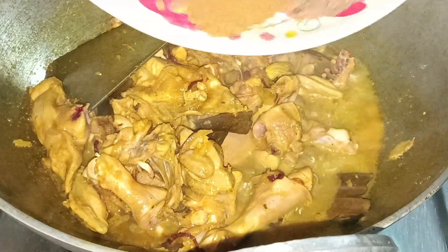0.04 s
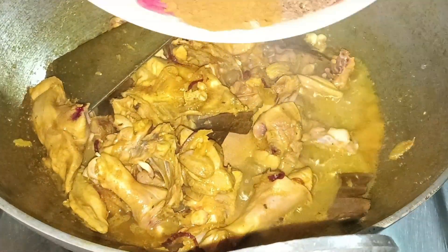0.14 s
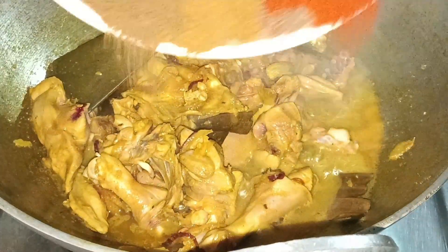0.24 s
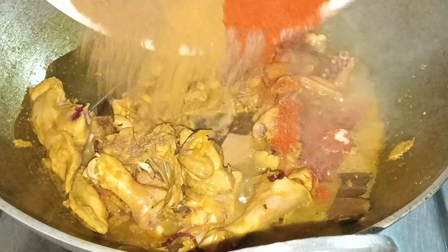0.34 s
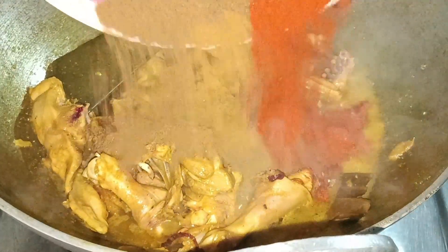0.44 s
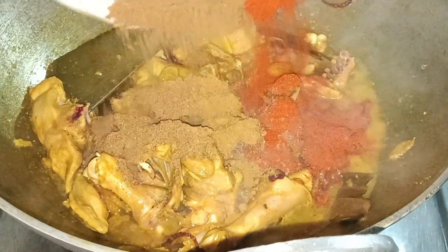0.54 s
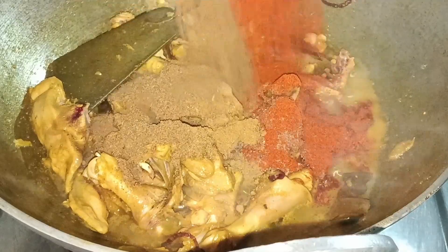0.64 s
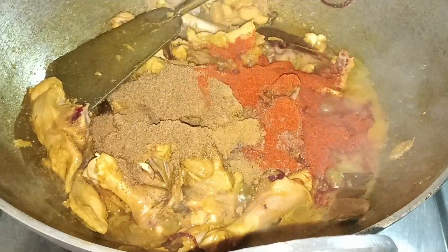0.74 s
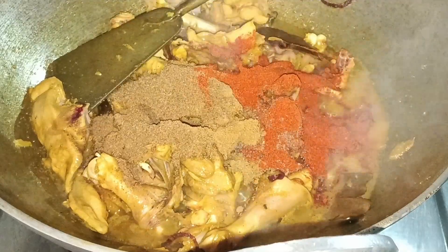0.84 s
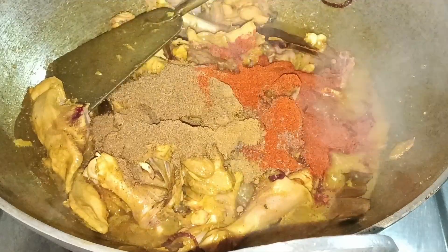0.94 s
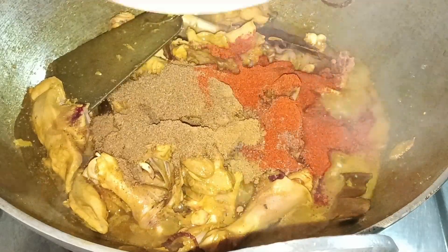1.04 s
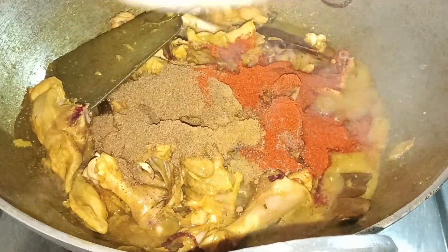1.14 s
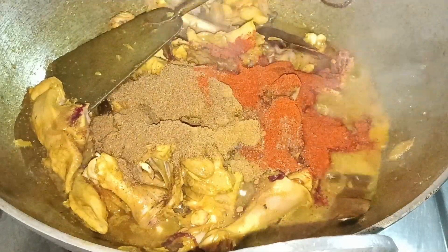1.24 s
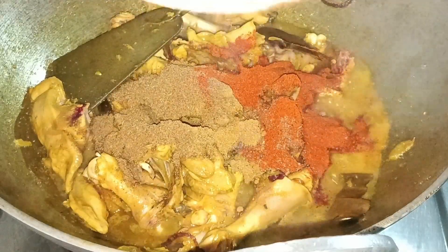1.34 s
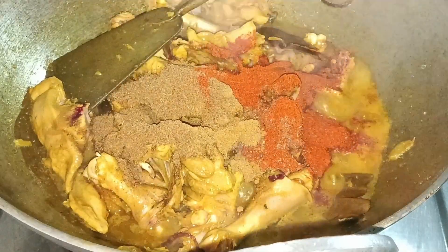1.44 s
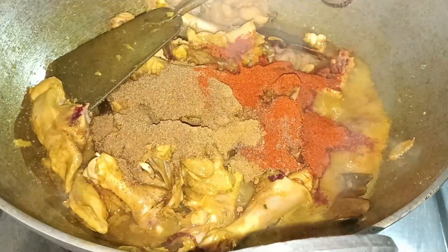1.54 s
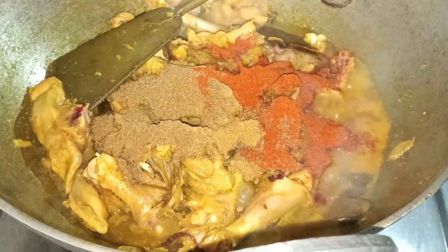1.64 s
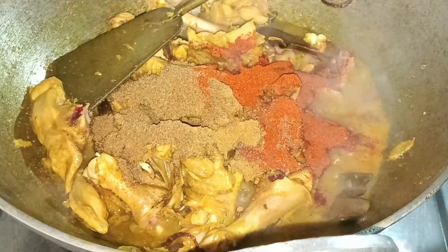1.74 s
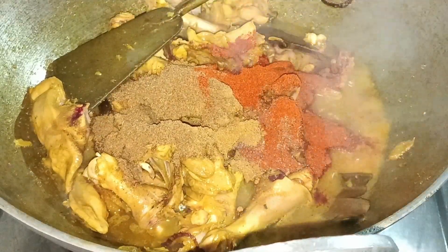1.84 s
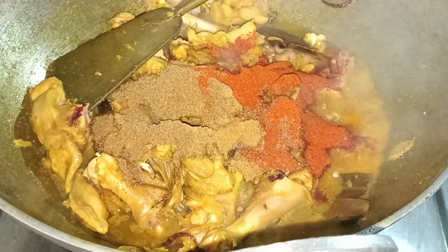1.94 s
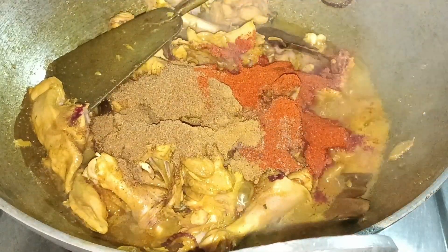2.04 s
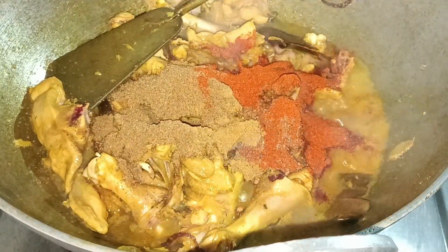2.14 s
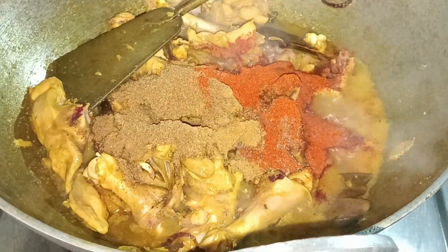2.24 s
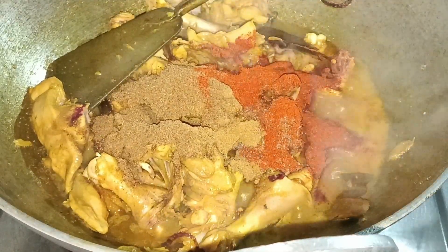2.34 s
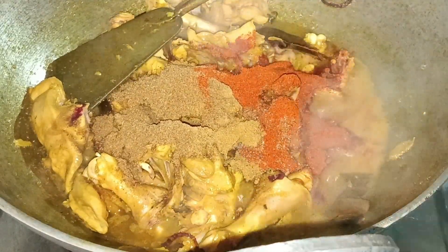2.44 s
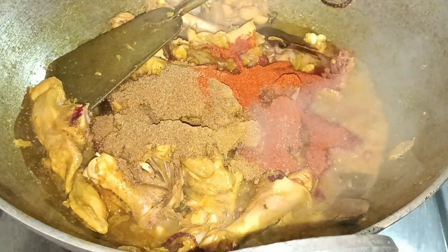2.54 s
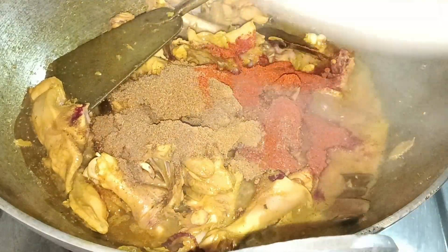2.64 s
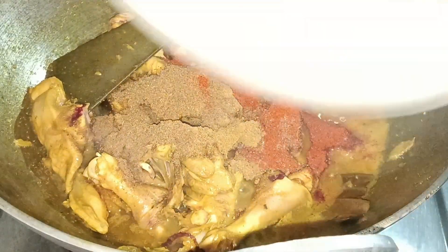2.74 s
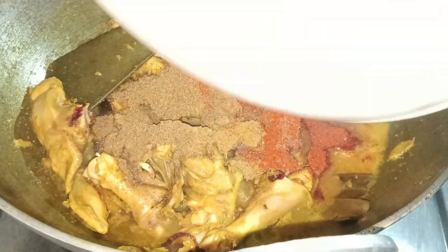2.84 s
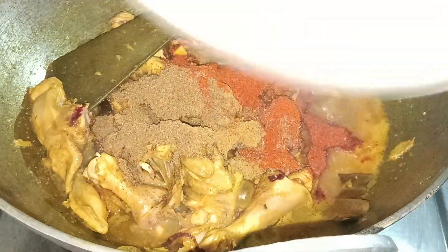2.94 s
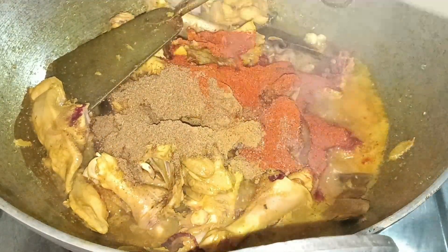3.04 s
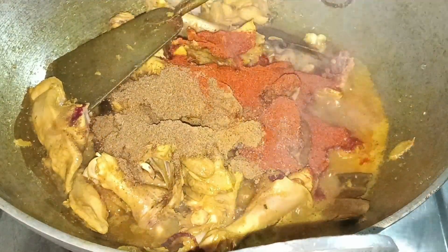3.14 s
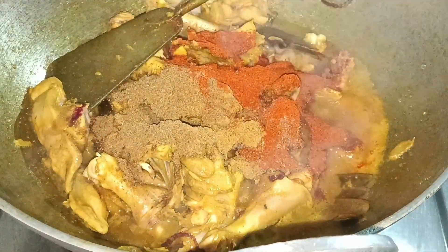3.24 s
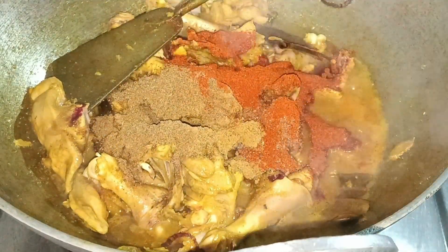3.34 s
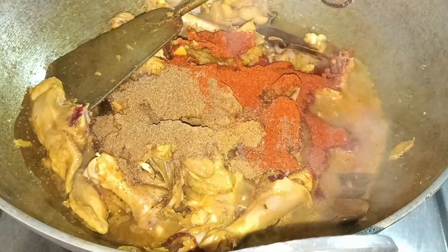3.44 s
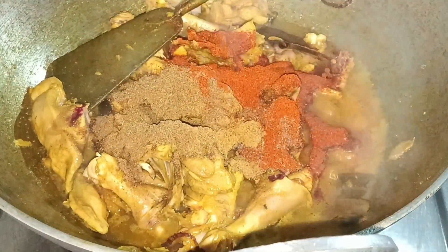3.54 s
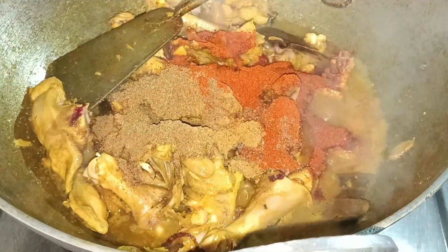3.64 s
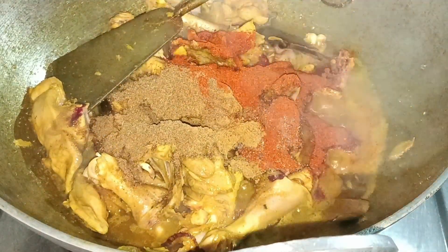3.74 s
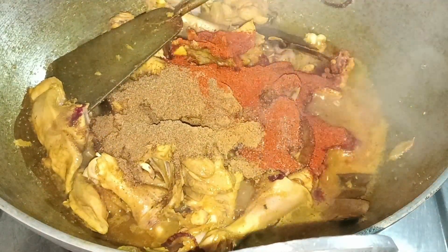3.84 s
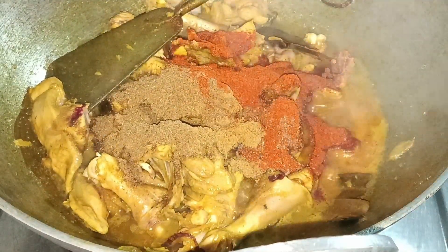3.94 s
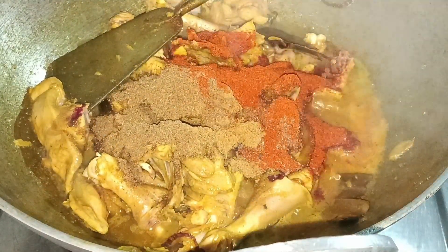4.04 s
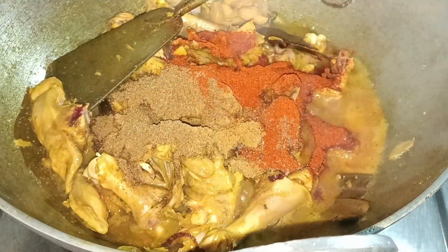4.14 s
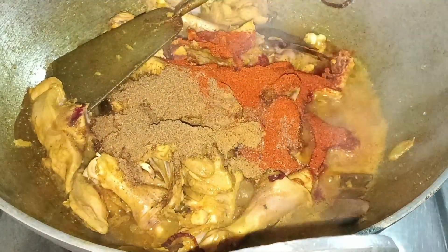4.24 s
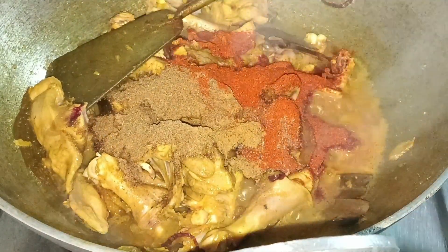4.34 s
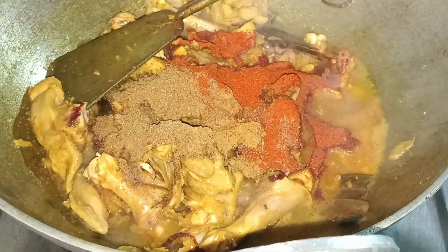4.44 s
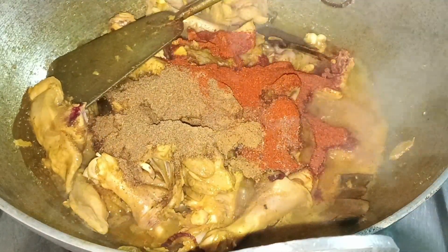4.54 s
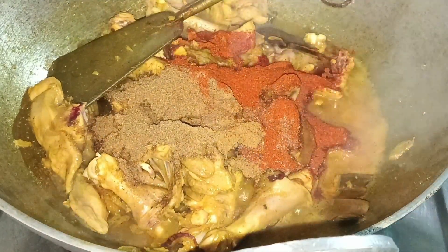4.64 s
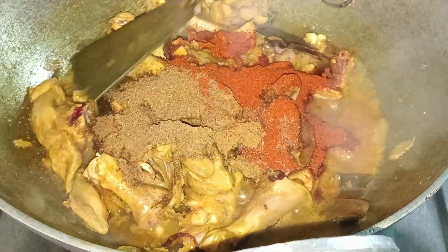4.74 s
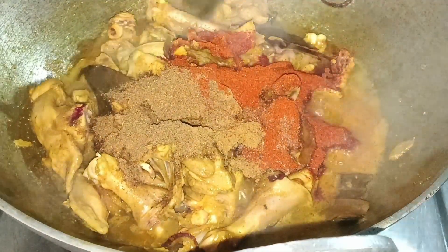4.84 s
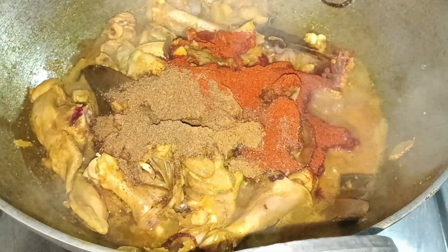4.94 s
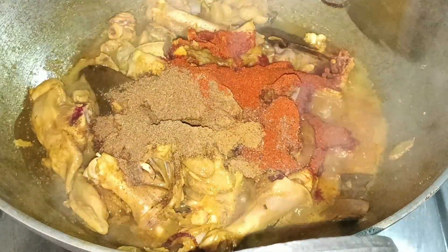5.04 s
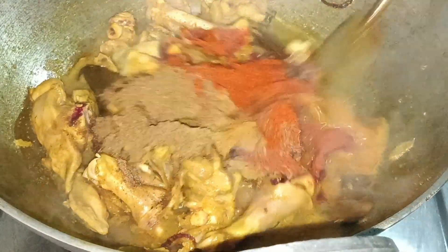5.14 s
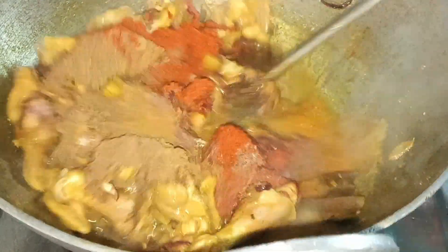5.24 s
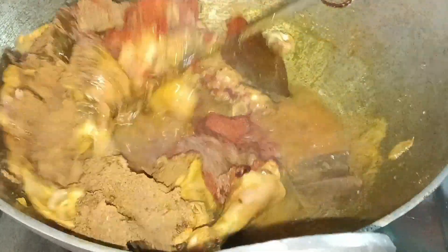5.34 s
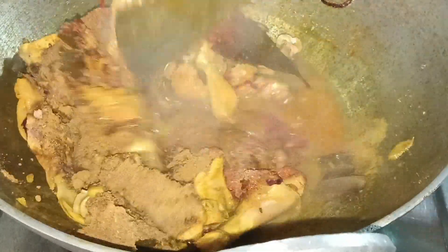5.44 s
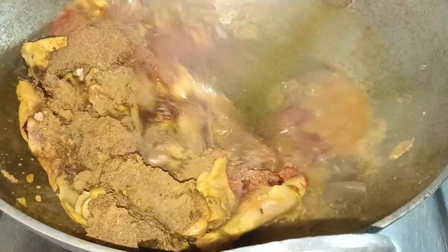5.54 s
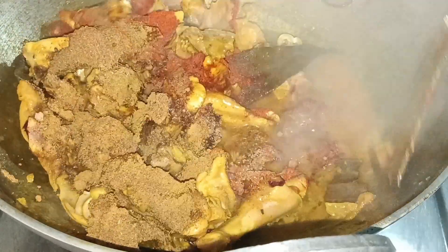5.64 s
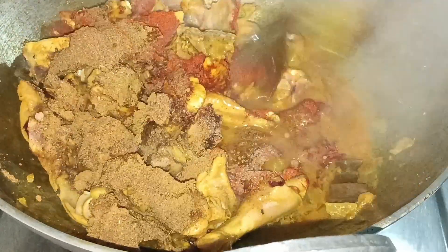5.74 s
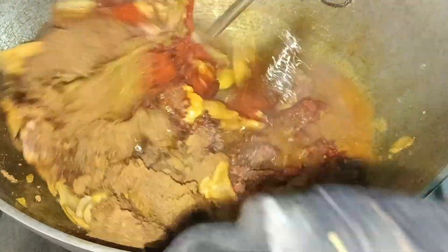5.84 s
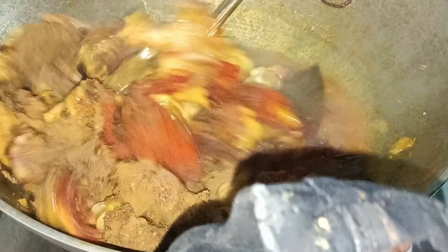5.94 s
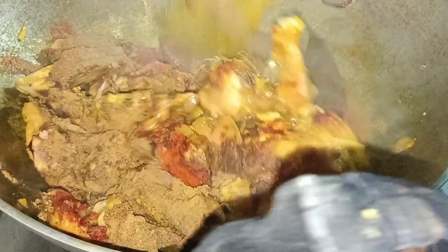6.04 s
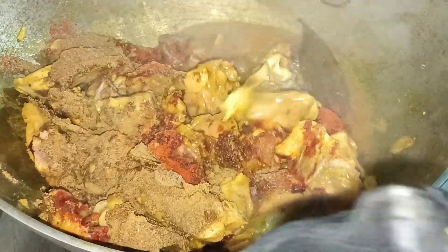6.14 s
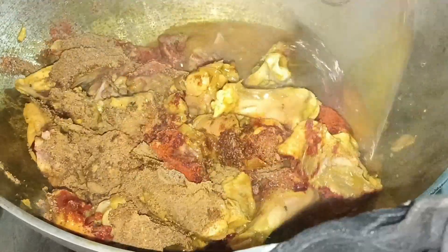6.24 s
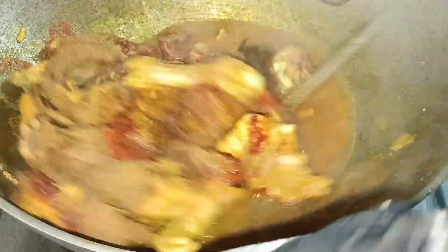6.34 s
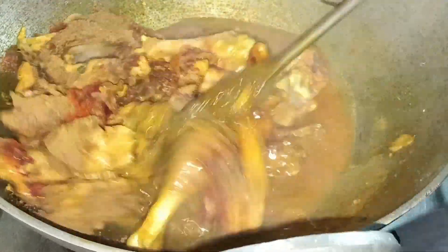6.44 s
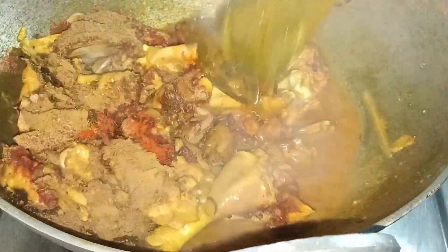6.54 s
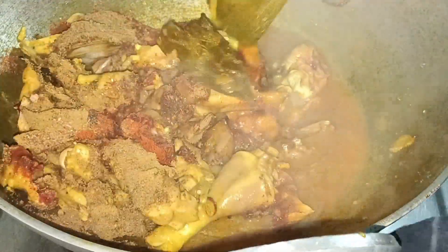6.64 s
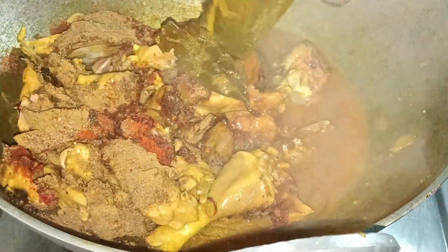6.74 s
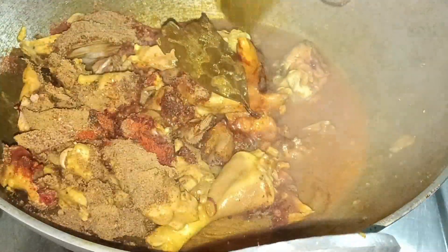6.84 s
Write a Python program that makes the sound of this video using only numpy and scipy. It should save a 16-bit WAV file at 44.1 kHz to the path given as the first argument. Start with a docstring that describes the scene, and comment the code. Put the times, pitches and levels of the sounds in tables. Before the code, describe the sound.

Chicken sizzles in oil and gravy in a wide metal pan for the whole seven seconds, a soft, dense crackle over steam hiss with scattered bubble pops and spits of oil. A fan motor hums and throbs quietly underneath. From about 2.6 to 2.9 seconds a hand taps a plate four times in quick succession, each a short, hollow knock. At 3.3 seconds the plate lands on the counter and slides with a bright clatter until about 3.7. The sizzle carries on with more pops and a few faint, thin whistles of steam. From 5 seconds a steel spatula knocks and scrapes the pan in three strokes, at roughly 5.0, 5.6 and 6.1 seconds, with sharp metallic clinks well above the sizzle. It stops around 6.4 seconds, leaving the sizzle and hum. Everything sounds close, in a kitchen with little echo.

```python
"""Kitchen: chicken simmers in oil and gravy in a wide metal pan; a fan motor hums and throbs.
The sizzle is bubble crackle over steam hiss, with single pops, thin whistles and spits of oil.
A hand taps a plate four times to shake out spice, sets it on the counter and slides it away;
then a steel spatula knocks and scrapes the pan in three strokes. Blows and friction ring their modes."""
import sys
import numpy as np
from scipy import signal
from scipy.io import wavfile
from scipy.ndimage import uniform_filter1d

SR = 44100
rng = np.random.default_rng(int(sys.argv[2]) if len(sys.argv) > 2 else 0)


def unload_audio(sound):
    """Save the sound as a 16-bit wav file, at the path given as the first command line argument."""
    columns = np.transpose(np.atleast_2d(sound))
    # keep every value between -1 and 1, then stretch to whole-number steps
    steps = np.round(np.clip(columns, -1, 1) * 32767)
    wavfile.write(sys.argv[1], SR, steps.astype(np.int16))


N = 303393


def sizzle(steam_share=1.1, bubbles_per_s=4000, spread_db=3., patchy_db=2.3, flicker_db=.9):
    """Dense crackle of tiny bubbles over steam hiss, coloured by the pan, in drifting patches."""
    # sizzle contour: time_s, level_db, tilt_db_per_octave
    contour = [(0, -41.5, 0.5), (2.4, -41, 0), (3.2, -41, 0.2), (4.0, -41, 0), (4.9, -40.5, -0.2),
               (5.45, -41, .5), (6.0, -42, 0.5), (6.45, -42.5, 0), (6.88, -43.5, -0.5)]
    # sizzle spectrum: freq_hz, density_db
    fizz = [(25, -19), (70, -83), (150, -9), (300, -22), (550, -15.5), (1190, -12.5), (2100, -10.5),
            (4500, -14.5), (6500, -21.5), (11900, -30.5), (15400, -40.5), (15800, -70)]
    # bands lifted by the bowl of the pan: centre_hz, width_hz, lift_db
    bowl = [(1050, 39, 6.5), (1510, 20, 8), (1630, 14, 7), (2110, 17, 10), (2820, 310, 5), (3470, 480, 3),
            (4500, 83, 4)]
    sizes = gain_of(spread_db * np.minimum(rng.exponential(1, N), 5))
    crackle = sizes * (rng.random(N) < bubbles_per_s / SR)
    raw = steam_share * rng.standard_normal(N) + unit_rms(crackle * rng.choice([-1., 1.], N))
    hz, t, spectrum = signal.stft(raw, SR, nperseg=1024, noverlap=768)
    colour_db = at_hz(fizz, hz) + sum(db / (1 + (2 * (hz - f) / width) ** 2) for f, width, db in bowl)
    patches = uniform_filter1d(rng.standard_normal((len(t), len(hz))).T, size=14, axis=0)
    patches = drift(patches, 5)
    flicker = drift(rng.standard_normal(len(t)), 3)
    time_s, level_db, tilt = np.transpose(contour)
    octaves = np.log2(np.maximum(hz, 500) / 2500)[:, None]
    tilt_db = octaves * np.interp(t, time_s, tilt)
    spectrum *= gain_of(colour_db[:, None] + patchy_db * patches + flicker_db * flicker + tilt_db)
    sound = unit_rms(signal.istft(spectrum, nperseg=1024, noverlap=768)[1][:N])
    return sound * gain_of(np.interp(np.arange(N) / SR, time_s, level_db))


def bubbles(puff_t60_s=0.02, ring_t60_s=0.017):
    """Each burst is a snap and a short ring; each whistle is noise in one narrow band."""
    # bursting bubbles: start_s, level_db, pitch_hz
    pops = [(0.0184, -29.5, 3220), (0.4644, -32, 4020), (0.5601, -25.5, 1510), (0.9293, -23, 1595),
            (1.2521, -30, 2130), (1.648, -34, 1490), (1.9944, -30.5, 1630), (2.4329, -28.5, 3950),
            (4.1345, -25, 2210), (4.4368, -30, 2820), (4.5136, -29, 2280), (4.6544, -25.5, 2060),
            (4.8095, -33, 1400), (4.8609, -25, 5070), (5.5303, -28.5, 3690), (6.3889, -26.5, 2160),
            (6.7211, -34, 4130)]
    # thin wavering whistles: start_s, length_s, pitch_hz, level_db
    whistles = [(3.785, 0.073, 7320, -51.5), (3.865, 0.062, 4450, -49), (3.905, 0.073, 7500, -54),
                (4.104, 0.049, 5600, -44), (4.258, 0.057, 7350, -51), (4.264, 0.037, 5700, -49),
                (4.441, 0.076, 4680, -43), (4.455, 0.055, 6840, -50), (4.592, 0.096, 6040, -54),
                (5.35, 0.061, 4600, -46), (5.416, 0.11, 7330, -50)]
    out = np.zeros(N)
    for start_s, db, hz in pops:
        puff = rng.standard_normal(2000) * decay(2000, puff_t60_s)
        body = ring(ring(puff, hz, ring_t60_s), hz, 0.0088)  # second pass rounds the onset
        snap = np.diff(puff, prepend=0)
        add(out, start_s, gain_of(db) * (0.72 * body / abs(body).max() + 0.022 * snap))
    for start_s, length_s, hz, db in whistles:
        band = unit_rms(ring(rng.standard_normal(8000), hz, t60_s=.012))
        tone = band[2000:][:round(length_s * SR)]
        add(out, start_s, gain_of(db) * tone * signal.windows.tukey(len(tone), .4))
    return out


def simmer(level_db=-52, bubbles_per_s=300, spread_db=3., decay_cycles=7., pitches=30):
    """Small gravy bubbles, each a short blip at its own pitch."""
    sizes = gain_of(spread_db * np.minimum(rng.exponential(1, N), 4))
    onsets = sizes * (rng.random(N) < bubbles_per_s / SR)
    pitch_index = rng.integers(0, pitches, N)
    out = np.zeros(N)
    for k, hz in enumerate(np.geomspace(1300, 5200, pitches)):
        cycles = np.arange(1500) / SR * hz
        blip = np.sin(2 * np.pi * cycles) * np.exp(-cycles / decay_cycles) * np.minimum(cycles / 2, 1)
        out += signal.oaconvolve(onsets * (pitch_index == k), blip)[:N]
    return gain_of(level_db) * unit_rms(out)


def spits(t60_s=0.058, band_hz=(4000, 9000)):
    """Short bursts of treble noise as water flashes to steam."""
    # spits of hot oil: start_s, level_db
    bursts = [(0.139, -33), (0.2817, -32), (0.5594, -32), (0.6494, -37), (0.6868, -37), (0.9283, -34),
              (0.9827, -36), (1.1987, -34), (1.4694, -33), (1.7194, -32), (2.0245, -27), (2.4894, -39),
              (3.743, -28.5), (4.5347, -24.5), (4.8614, -31), (6.4742, -35)]
    out = np.zeros(N)
    for start_s, db in bursts:
        add(out, start_s, 0.47 * gain_of(db) * rng.standard_normal(3000) * decay(3000, t60_s))
    return signal.sosfilt(signal.butter(2, band_hz, "band", fs=SR, output="sos"), out)


def spatula_on_pan():
    """Steel knocks and scrapes ring the pan and the spatula."""
    # pan and spatula modes: freq_hz, level_db, t60_s
    modes = [(650, -16, .04), (1000, -13, .04), (1371, -4, .06), (1790, -7, .05), (1980, -4, .06),
             (2130, 0, .06), (2410, -4, .06), (2830, -7, .05), (3360, -3, .07), (4110, -5, .05),
             (4390, -6, .05), (5010, -6, .05), (5500, -5, .05), (6080, -6, .07), (6505, -5, .17),
             (7050, -8, .06), (7600, -10, .06), (8350, -6, .06), (9400, -6, .08), (10300, -9, .045),
             (11400, -7, .04), (13000, -9, .035), (13900, -5, .045)]
    # knocks: start_s, level_db, centre_hz, hiss_db, falloff_db_per_octave, t60_factor
    blows = [(4.9976, -10.5, 5800, -14, 7, 0.79), (5.009, -1, 9000, -11, 1, 0.44),
             (5.0734, -8.5, 5300, -27, 33, 0.5), (5.1948, 2, 4030, -17.5, 18, 0.26),
             (5.5736, -6.5, 6500, -10, 4, 0.77), (5.6376, -9.5, 4500, -25, 9, 0.35),
             (5.7451, -7, 3900, -28, 11, 0.36), (5.897, -16.5, 5370, -36, 11, 0.35),
             (6.089, -7.5, 6600, -11, 4.5, 0.92), (6.097, 0.5, 6500, -16.5, 12, 0.37),
             (6.1968, -4.5, 4300, -40, 12, 0.49), (6.242, -1.5, 2200, -28, 15, 1),
             (6.4024, -30, 5000, -19, 8, .5)]
    # scrapes, one list a stroke: time_s, level_db, centre_hz, hiss_db
    strokes = [
        [(5.045, -35, 5000, -4), (5.075, -29, 3780, -6), (5.11, -20, 2260, -23), (5.168, -16.5, 2120, -25),
         (5.19, -22, 2550, -23), (5.21, -17, 2900, -26), (5.24, -30, 2020, -18), (5.3, -50, 1900, -29)],
        [(5.632, -35, 4200, 2), (5.645, -30.5, 3900, -7), (5.705, -35.5, 3040, -6), (5.75, -17.5, 2630, -21),
         (5.795, -21.5, 2220, -25), (5.825, -33.5, 2100, -18), (5.87, -57, 2100, -30)],
        [(6.11, -32, 6300, -19), (6.138, -39, 6000, -6), (6.17, -26, 4500, -4), (6.196, -16.5, 3460, -23),
         (6.25, -21, 2420, -17), (6.305, -25.5, 2340, -36), (6.375, -52, 1900, -40)],
    ]
    knocks = strike(modes, blows, chatter=0.17, chatter_t60_s=0.035, click=0.28)
    scrapes = rub(modes, strokes, falloff_db_per_octave=9.5)
    return radiate(knocks + scrapes, hiss_tilt_db_per_octave=7.5, highpass_hz=650)


def plate_in_hand():
    """Finger taps ring the held plate."""
    # held plate modes: freq_hz, level_db, t60_s
    modes = [(121, -3, 0.024), (204, 2.5, 0.048), (390, -25, 0.015), (580, 0, 0.039), (692, 3, 0.058),
             (827, -8.5, 0.05), (1000, 0, 0.021), (1215, 3, 0.034), (1393, -6.5, 0.16), (1476, -8.5, 0.17),
             (1720, -10, 0.034), (2160, -4.5, 0.043), (2920, -13, .04), (3880, -2.5, 0.021),
             (4600, -8.5, .03)]
    # finger taps: start_s, level_db, centre_hz, hiss_db, falloff_db_per_octave, t60_factor
    blows = [(2.5879, 1.5, 850, -46, 5, 1.), (2.6888, 2, 1000, -48, 5.8, 0.62),
             (2.7803, 7, 1280, -49, 5.5, 0.98), (2.8625, -3, 560, -36, 6.5, 0.84)]
    taps = strike(modes, blows, chatter=0.024, chatter_t60_s=0.018, click=0.87)
    return radiate(taps, hiss_tilt_db_per_octave=-6.0, highpass_hz=150)


def plate_on_counter():
    """The plate lands on the steel counter and clatters as it slides."""
    # modes of the plate on the counter: freq_hz, level_db, t60_s
    modes = [(520, -12.5, 0.2), (723, 1.5, 0.037), (850, -8, 0.06), (1097, -6, 0.037), (1280, -5, 0.094),
             (1470, 3.5, 0.099), (2003, -0.5, 0.11), (2970, -1, 0.041), (3790, 1.5, 0.032),
             (4450, 1.5, 0.029), (4870, -2.5, 0.094), (5520, 2, 0.067), (5820, -6, 0.055), (6600, -8, 0.13),
             (7950, -11, .09), (8550, -15, 0.11), (9100, -18, 0.091), (10800, -24, 0.11)]
    # knocks: start_s, level_db, centre_hz, hiss_db, falloff_db_per_octave, t60_factor
    blows = [(3.335, -1, 1700, -16, 10.5, 0.56), (3.366, -10.5, 1470, -20, 5.5, 1.),
             (3.46, -17, 4500, -22, 1.7, 1.), (3.506, -1.5, 5660, -18.5, 2.1, 0.29),
             (3.532, -8, 4000, -20, 1.8, 0.97), (3.561, -6.5, 5490, -17, 2.3, 0.43),
             (3.585, -1.5, 5520, -22, 2.3, 0.65)]
    # slide, one stroke: time_s, level_db, centre_hz, hiss_db
    strokes = [
        [(3.452, -42, 4500, 7), (3.475, -25.5, 4500, -15), (3.5, -41, 4500, -6), (3.545, -26, 3800, -12),
         (3.604, -21, 4500, -8.5), (3.635, -36, 3500, -8), (3.7, -59, 2500, -10)],
    ]
    knocks = strike(modes, blows, chatter=0.14, chatter_t60_s=0.035, click=0.54)
    slide = rub(modes, strokes, falloff_db_per_octave=0.5)
    return radiate(knocks + slide, hiss_tilt_db_per_octave=-13.5, highpass_hz=450)


def strike(modes, blows, chatter, chatter_t60_s, click):
    """Each blow drives the modes with a click and dying chatter. Returns ringing and hiss envelope."""
    ringing, hiss_envelope = np.zeros((2, N))
    impulse = signal.unit_impulse(8000)
    for start_s, db, centre_hz, hiss_db, falloff, t60_factor in blows:
        envelope = gain_of(db) * decay(8000, chatter_t60_s)
        force = chatter * rng.standard_normal((len(modes), 8000)) * envelope + click * gain_of(db) * impulse
        weights = mode_weights(modes, centre_hz, falloff)
        force *= weights / weights.sum()
        for k, (hz, _, t60_s) in enumerate(modes):  # neighbouring modes start in opposite directions
            add(ringing, start_s, (-1) ** k * ring(force[k], hz, t60_factor * t60_s))
        add(hiss_envelope, start_s, gain_of(hiss_db) * envelope)
    return np.array([ringing, hiss_envelope])


def rub(modes, strokes, falloff_db_per_octave, widening=3.1, grit_db=1.6, wander_db=3., sag_per_s=.3):
    """Stick-slip friction drives the modes as noise bands. Returns ringing and hiss envelope."""
    ringing, hiss_envelope = np.zeros((2, N))
    for stroke in strokes:
        time_s, *columns = np.transpose(stroke)
        start_s = time_s[0]
        t = np.arange(start_s, time_s[-1], 1 / SR)
        db, centre_hz, hiss_db = (np.interp(t, time_s, column) for column in columns)
        grit = gain_of(grit_db * drift(rng.standard_normal(len(t)), 150))
        force = gain_of(db) * unit_rms(grit) * signal.windows.tukey(len(t), .1)
        wander = drift(rng.standard_normal((len(modes), len(t))), 1200)  # the contact point moves
        weights = mode_weights(modes, centre_hz, falloff_db_per_octave) * gain_of(wander_db * wander)
        weights /= np.linalg.norm(weights, axis=0)
        bend = 1.01 - sag_per_s * (t - start_s)  # pitch sinks along the stroke
        for weight, (hz, _, t60_s) in zip(weights, modes):
            width_hz = widening * np.log(1000) / (np.pi * t60_s) + hz / 28  # pressing damps the mode
            add(ringing, start_s, force * weight * noise_band(hz * bend, width_hz))
        add(hiss_envelope, start_s, gain_of(hiss_db) * force)
    return np.array([ringing, hiss_envelope])


def mode_weights(modes, centre_hz, falloff_db_per_octave):
    """Contact favours the modes near centre_hz."""
    hz, level_db, _ = np.transpose(modes)[:, :, None]
    return gain_of(level_db - falloff_db_per_octave * abs(np.log2(hz / centre_hz)))


def radiate(contact, hiss_tilt_db_per_octave, highpass_hz):
    """Ringing, its bass weakly radiated, plus contact hiss."""
    ringing, hiss_envelope = contact
    highpass = signal.butter(2, highpass_hz, "high", fs=SR, output="sos")
    return signal.sosfilt(highpass, ringing) + hiss_envelope * contact_hiss(hiss_tilt_db_per_octave)


def contact_hiss(tilt_db_per_octave, patchy_db=4.0):
    """Streaky treble noise from the many close modes of thin metal."""
    # hiss spectrum: freq_hz, level_db
    colour = [(1000, -45), (3000, -20), (5500, -5), (8000, 0), (12000, -2), (15400, -7), (15800, -40)]
    hz, _, spectrum = signal.stft(rng.standard_normal(N), SR, nperseg=512)
    streaks = drift(uniform_filter1d(rng.standard_normal(spectrum.shape), size=4, axis=0), 8)
    colour_db = at_hz(colour, hz) + tilt_db_per_octave * np.log2(np.maximum(hz, 5000) / 5000)
    spectrum *= gain_of(colour_db[:, None] + patchy_db * streaks)
    return unit_rms(signal.istft(spectrum, nperseg=512)[1][:N])


def fan(hum_hz=200., shaft_hz=7.9, first_throb_s=.02, waver_db=2):
    """The tones line up once a shaft turn, so the hum throbs; the housing adds narrow rumble."""
    # swell of hum and rumble: time_s, level_db
    swell = [(0, -50.5), (1.15, -49.5), (1.3, -52.5), (1.7, -48), (1.95, -55), (2.2, -50.5), (2.47, -55),
             (2.9, -46.5), (3.35, -56.5), (3.62, -45.5), (3.87, -57.5), (4.06, -43), (4.2, -54),
             (4.9, -53.5), (5.3, -48.5), (5.5, -54.5), (5.82, -45.5), (6.15, -53), (6.88, -52.5)]
    # motor tones, one per shaft multiple: relative_db
    tone_db = [-34, -3, -4, -24, -26.5]
    # housing resonances: centre_hz, width_hz, relative_db
    housing = [(162, 27, -13.5), (214.1, 34.5, -4), (254.4, 12, -11), (342.3, 38, -16), (528, 6.7, -20.5)]
    t = np.arange(N) / SR
    hum = np.zeros(N)
    for multiple, db in zip((-2, 0, 1, 2, 7), tone_db):
        hz = hum_hz + multiple * shaft_hz
        hum += np.sqrt(2) * gain_of(db) * np.cos(2 * np.pi * hz * (t - first_throb_s))
    for hz, width_hz, db in housing:
        t60_s = 2.1 / width_hz
        hum += gain_of(db) * unit_rms(ring(ring(rng.standard_normal(N), hz, t60_s), hz, t60_s))
    waver = drift(uniform_filter1d(rng.standard_normal(N), size=2500), 2500)
    return hum * gain_of(np.interp(t, *np.transpose(swell)) + waver_db * waver)


def kitchen(x):
    """Sparse echoes of random sign, each band dying at its own rate."""
    # room decay: freq_hz, t60_s
    room_t60 = [(300, 0.19), (1500, 0.11), (5000, 0.079), (12000, 0.13)]
    taps = np.zeros(SR // 2)
    slots = np.arange(300, SR // 2 - 20, 20)
    taps[slots + rng.integers(0, 20, len(slots))] = rng.choice([-1., 1.], len(slots))
    hz, t, spectrum = signal.stft(taps, SR, nperseg=256)
    spectrum *= gain_of(-60 * t / at_hz(room_t60, hz)[:, None])
    tail = signal.istft(spectrum, SR, nperseg=256)[1]
    return signal.fftconvolve(x, tail / np.linalg.norm(tail))[:N]


def ring(x, hz, t60_s):
    """One mode: a unit click starts a decaying sine of height 1."""
    radius, turn = gain_of(-60 / (t60_s * SR)), 2 * np.pi * hz / SR
    return signal.lfilter([np.sin(turn)], [1, -2 * radius * np.cos(turn), radius * radius], x)


def noise_band(hz, width_hz):
    """Steep noise band that follows the curve hz, rms 1."""
    real, imag = rng.standard_normal((2, len(hz)))
    pole = [1, -np.exp(-np.pi * width_hz / SR)]
    baseband = signal.lfilter([1], np.convolve(pole, pole), real + 1j * imag)
    return unit_rms((baseband * np.exp(2j * np.pi * np.cumsum(hz) / SR)).real)


def drift(noise, steps):
    """Moving average along the last axis, rms 1."""
    return unit_rms(uniform_filter1d(noise, size=steps))


def decay(samples, t60_s):
    return gain_of(-60 * np.arange(samples) / SR / t60_s)


def gain_of(db):
    return 10 ** (np.asarray(db) / 20)


def unit_rms(x):
    return x / np.sqrt(np.mean(x ** 2) + 1e-20)


def at_hz(points, hz):
    freq_hz, value = np.transpose(points)
    return np.interp(np.log(hz + 1), np.log(freq_hz + 1), value)


def add(mix, start_s, sound):
    part = mix[round(start_s * SR):][:len(sound)]
    part += sound[:len(part)]


def scene():
    """Mono mix; sizzle and fan stay dry, the rest echoes in the kitchen."""
    plate = plate_in_hand()
    counter = plate_on_counter()
    pan = spatula_on_pan() + bubbles() + simmer() + spits()
    echo = kitchen(gain_of(-9) * plate + gain_of(-5.5) * counter + gain_of(-11) * pan)
    return (plate + counter + pan + echo + sizzle() + fan())[None]


def record(dry):
    """Steep low-pass at 16.4 kHz."""
    lowpass = signal.firwin(255, 16400, window=("kaiser", 7), fs=SR)
    return signal.oaconvolve(dry, lowpass[None], "same")


dry = scene()
out = record(dry)
unload_audio(out)
```